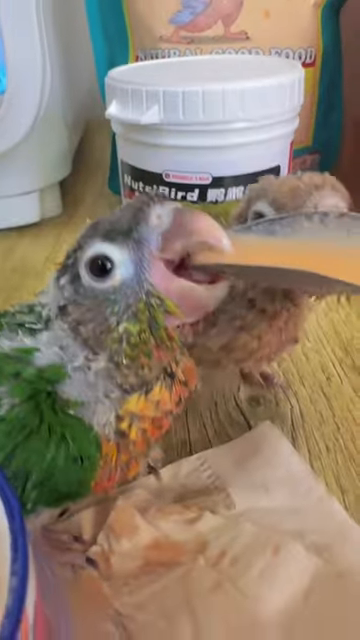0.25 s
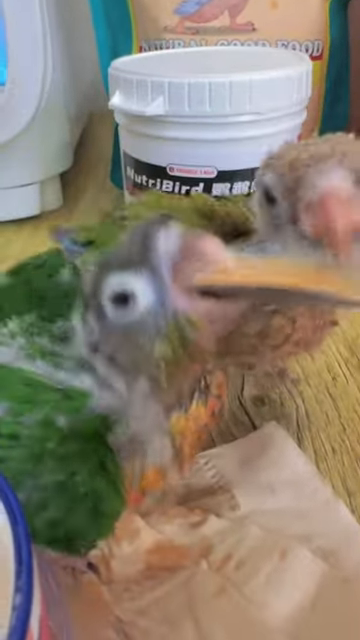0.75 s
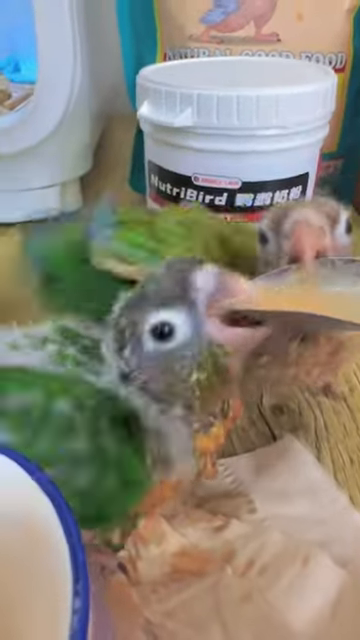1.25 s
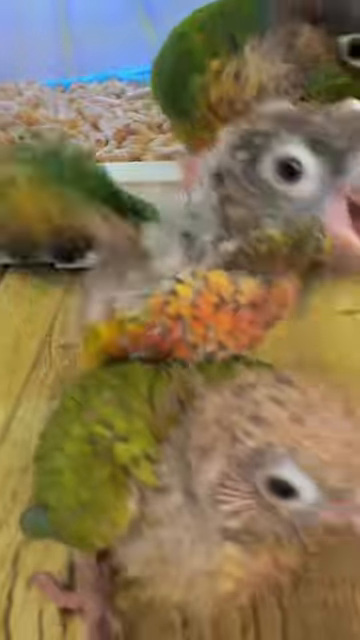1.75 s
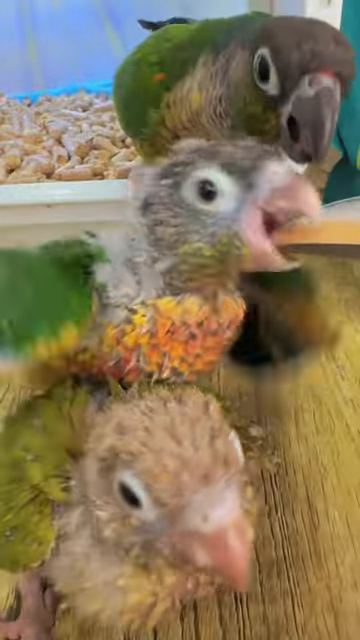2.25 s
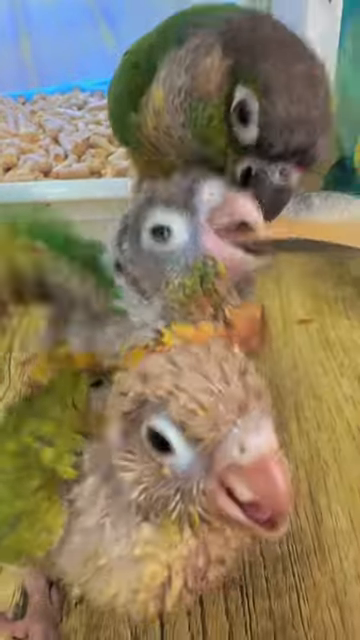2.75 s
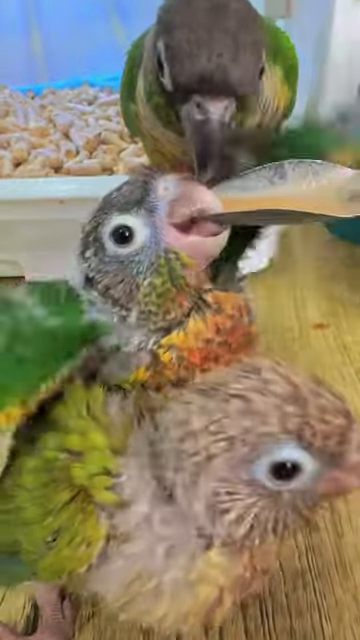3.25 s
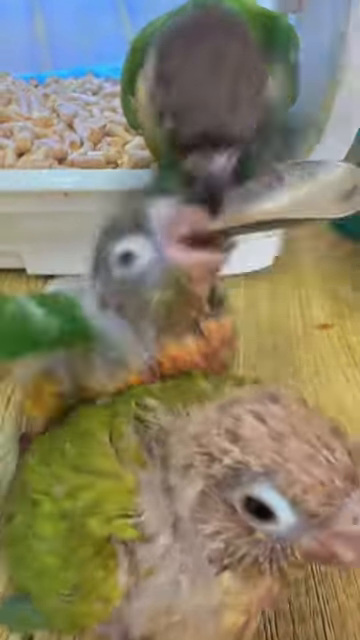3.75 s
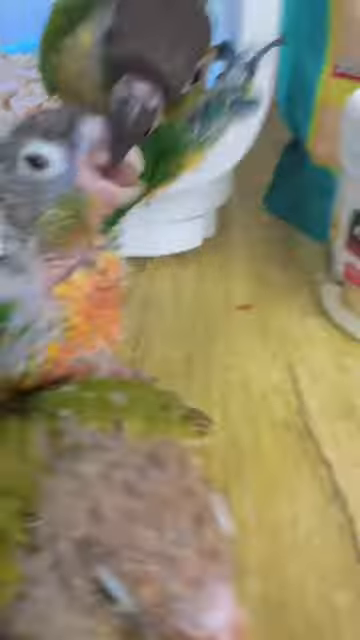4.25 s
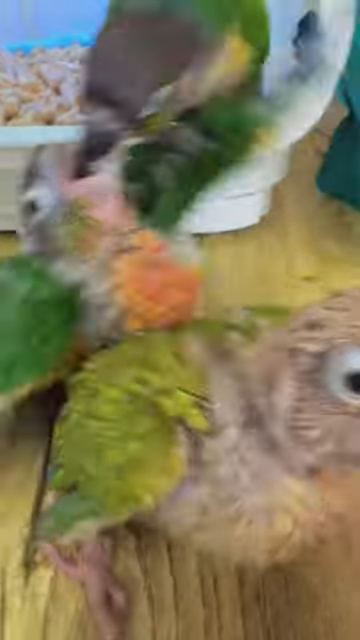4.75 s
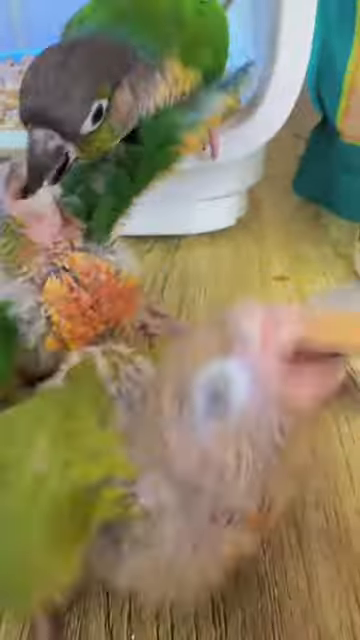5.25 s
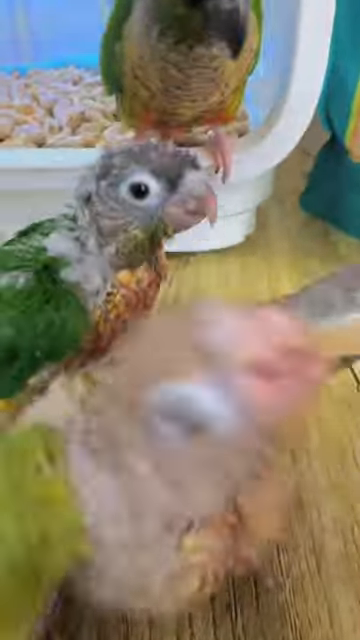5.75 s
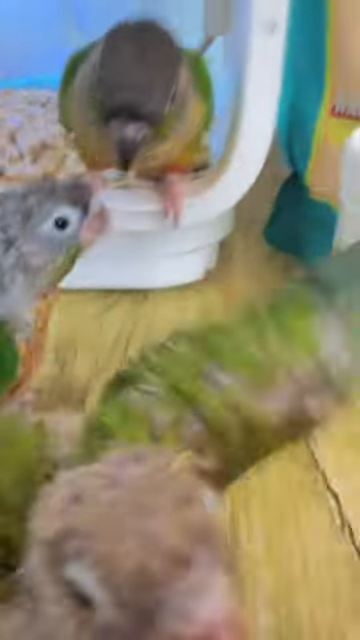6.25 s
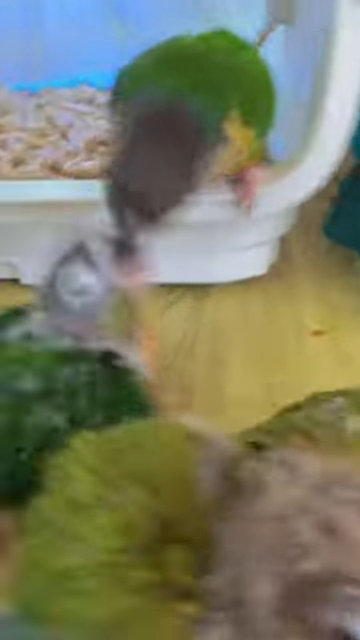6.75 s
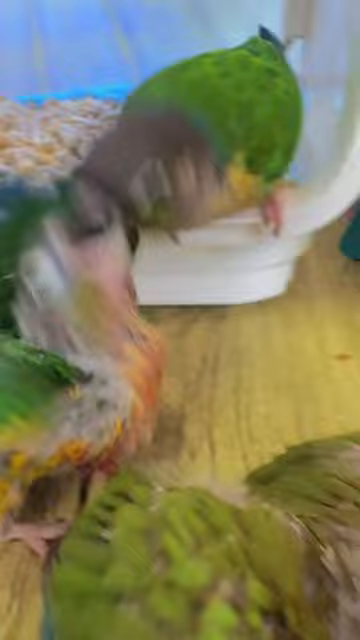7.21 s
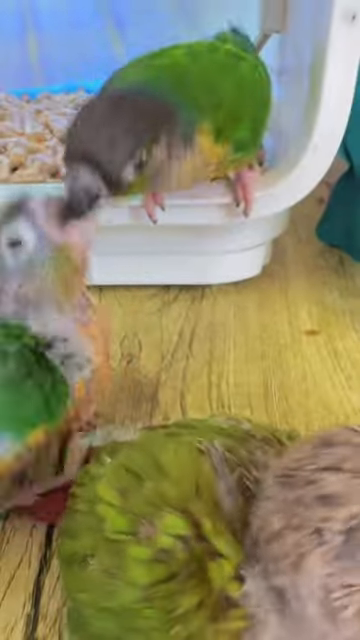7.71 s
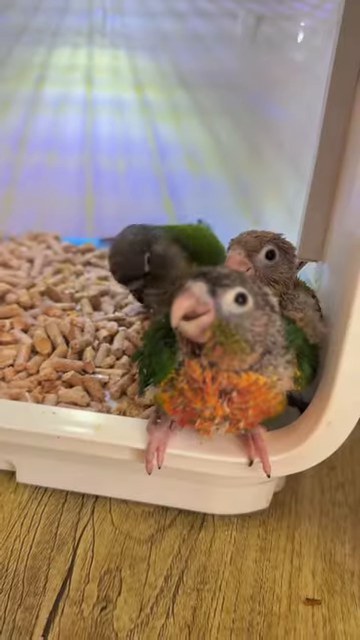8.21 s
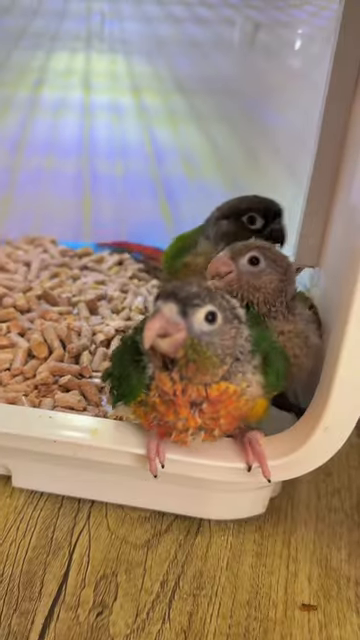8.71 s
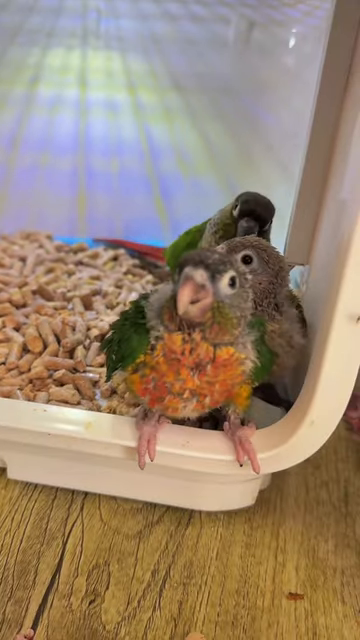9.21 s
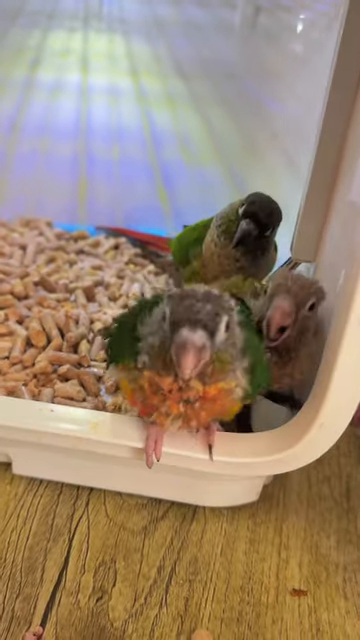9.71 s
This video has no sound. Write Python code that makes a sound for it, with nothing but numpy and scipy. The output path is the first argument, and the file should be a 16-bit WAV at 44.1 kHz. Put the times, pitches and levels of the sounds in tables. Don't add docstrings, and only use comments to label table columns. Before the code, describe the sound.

Close, shrill begging calls from parrot chicks, each about a twentieth of a second, some clear and arched, others fluttering and harsh. They start in spaced bursts, pause, then cluster around six seconds with small dry ticks. A soft wooden thump interrupts before eight seconds, then rapid squeaks and high yelps return. The indoor space adds a short, faint tail, with slight low rumble from movement.

```python
import sys
import numpy as np
from scipy import signal
from scipy.fft import rfft, irfft, next_fast_len
from scipy.io import wavfile
from scipy.ndimage import uniform_filter1d

SR = 44100
rng = np.random.default_rng(int(sys.argv[2]) if len(sys.argv) > 2 else 0)


def int16_out(signal):
    q = np.round(np.clip(np.atleast_2d(signal).T, -1, 1) * 32767)
    wavfile.write(sys.argv[1], SR, q.astype(np.int16))


def nominal_scale(level):
    x = np.asarray(level, float) / 20
    return 10 ** x


N = 439677

# (time [s], level [dB])
RUMBLE = [(0, -71.5), (1.5, -68.5), (2.1, -67), (2.5, -75), (3.3, -73), (3.8, -58), (4.15, -59.5),
          (4.35, -78), (5.4, -73.5), (5.999, -62.5), (7.1, -67), (7.4, -52), (8.1, -61), (8.45, -55),
          (8.8, -60), (9.97, -62.5)]
# (frequency [Hz], density [dB per Hz])
RUMBLE_COLOUR = [(25, -17), (60, 0), (130, -9), (320, -15.5), (900, -30), (3000, -45)]
# (time [s], peak [dB], ring [Hz])
TICKS = [(0.2255, -45.5, 1030), (2.0396, -58, 1585), (5.4881, -49, 5620), (5.6042, -48.5, 5730),
         (5.6498, -49, 6010), (5.7041, -44, 5840), (6.0566, -39, 7800), (6.2026, -27.5, 8240),
         (6.274, -46.5, 6900), (6.3792, -47.5, 1174), (6.434, -31.5, 7350), (7.5803, -20.5, 1189),
         (7.7089, -39, 1200), (8.248, -44.5, 7730), (8.2946, -49.5, 974), (8.4038, -43, 6860),
         (8.67, -27, 3490), (9.1655, -51, 1038)]
# (frequency
# [Hz], gain [dB])
CALL_COLOUR = [(300, -57.5), (700, -27.5), (1300, -25.5), (2500, -14), (4500, -4), (6000, -0.5), (8200, -6.5),
               (10300, -25), (11200, -42), (13500, -38), (15700, -22.5), (16400, -46)]
# (time [s], peak [dB])
KNOCKS = [(0.293, -41), (0.374, -54), (0.65, -56), (3.635, -52), (3.67, -50), (3.865, -50), (4.04, -50),
          (7.14, -52), (1.691, -37.5), (1.75, -45), (1.822, -52), (2.184, -50.5), (7.518, -40.5),
          (7.57, -37.5), (7.781, -22.5)]
# (frequency [Hz], level [dB], t60 [s])
BOARDS = [(119, -7, .17), (179, -1.5, .15), (338, 0.5, 0.11), (794, -14, 0.05)]
# (start [s], length [s], level [dB], first pitch [Hz], last pitch [Hz])
PEEPS = [(0.696, 0.11, -44.5, 992, 1600), (5.504, 0.074, -60.5, 1550, 1400),
         (6.039, 0.053, -59, 1450, 1400), (6.192, 0.028, -37, 1393, 1380), (6.373, 0.083, -56, 1193, 1330),
         (8.048, 0.069, -63.5, 1300, 1300)]

# (loudest moment [s], swell [s], fade [s], peak [dB], top pitch [Hz])
SQUEAKS = [(.536, 0.03, 0.041, -8.5, 1120), (1.246, 0.031, 0.04, -7, 1216),
           (3.424, 0.028, .026, -13.5, 1248), (6.621, .027, .031, -13.5, 1211),
           (9.696, .02, .036, -10, 1364)]
# (loudest moment [s], swell [s], fade [s], peak [dB], top pitch [Hz])
NOTES = [(.803, .03, .042, -10, 1150), (8.593, .023, .018, -11.5, 1366), (1.786, .029, .023, -11, 1295),
         (2.682, .03, .018, -15, 1303), (8.842, .018, .026, -11, 1355)]
# (loudest moment [s], swell [s], fade [s], peak [dB], top pitch [Hz])
PIPES = [(2.78, .015, .037, -15, 1254), (3.803, 0.026, .03, -10, 1303), (4.632, 0.029, 0.032, -15.5, 1227),
         (5.088, .032, 0.039, -13, 1236), (6.007, .016, .024, -9, 1190), (6.515, 0.025, .033, -9.5, 1257),
         (7.052, .029, .041, -12, 1241), (7.466, 0.031, 0.017, -14, 1215), (8.488, .022, .036, -11.5, 1385),
         (9.59, .033, .029, -12, 1370)]
# (loudest moment [s], swell [s], fade [s], peak [dB], top pitch [Hz])
DOUBLES = [(5.0, .024, 0.029, -13.5, 1394), (9.511, .013, .026, -11, 1467)]
# (loudest moment [s], swell [s], fade [s], peak [dB], top pitch [Hz])
CHIRPS = [(5.94, .018, .023, -19.5, 1150), (6.135, 0.014, .021, -17, 1200),
          (8.444, .015, 0.025, -13.5, 1200), (1.488, .018, .028, -21, 1000)]
# (loudest moment [s], swell [s], fade [s], peak [dB], top pitch [Hz])
RASPS = [(.295, .031, .041, -10.5, 1095), (.595, .022, 0.025, -16.5, 1240),
         (1.168, .028, .027, -14.5, 1250), (2.187, .013, .034, -12, 1324), (2.59, .021, .036, -11, 1369),
         (2.715, .015, .02, -19, 1325), (4.231, .014, .023, -14.5, 1246), (4.676, .022, 0.027, -19.5, 1178),
         (5.378, .022, .026, -20, 1178), (6.567, .019, .014, -19.5, 1393), (7.342, .016, .03, -20.5, 1250),
         (8.548, .015, .024, -17, 1130), (1.694, .015, .028, -13.5, 1380), (7.762, .025, .022, -17, 1290)]
# (loudest moment [s], swell [s], fade [s], peak [dB], top pitch [Hz])
SHRIEKS = [(3.94, .017, 0.024, -16.5, 1367), (4.535, .015, 0.023, -15, 1129),
           (6.835, 0.019, .025, -14.5, 1485)]
# (loudest moment [s], swell [s], fade [s], peak [dB], top pitch [Hz])
WHISTLES = [(8.717, .019, 0.031, -14, 2110), (8.795, .023, .03, -10, 2110)]
# (loudest moment [s], swell [s], fade [s], peak [dB], top pitch [Hz])
CROAKS = [(3.278, .029, .016, -21.5, 1550), (3.702, 0.013, 0.022, -19.5, 1080),
          (4.163, .033, 0.008, -25.5, 1299), (6.481, .01, 0.012, -16.5, 1079)]
# (half-pitch lines [dB], odd harmonics [dB], treble [dB], low harmonics [dB])
KINDS = [(SQUEAKS, (.21, .35, .65, .25, .27, .1, 2.3), (-24, -3, -3.5, -10)),
         (NOTES, (.2, .55, .6, .25, .05, .2, 3.6), (-24, -1.5, 1.5, -9.5)),
         (PIPES, (.3, .35, .6, .27, .24, .08, 2.7), (-17, -9, 1.5, -9)),
         (DOUBLES, (.28, .4, .45, .2, .05, .15, 3.3), (-3.5, -4, 1, -9)),
         (CHIRPS, (.34, .1, .55, .36, .15, .45, 2.1), (-25, -6, -5, -5)),
         (RASPS, (.58, .05, 0.48, .3, .17, .05, 2.8), (-24, -3.5, -6, -13)),
         (SHRIEKS, (.56, .1, .3, .27, .2, .05, 2.4), (-18.5, 6, -5, -16)),
         (WHISTLES, (.26, .4, .5, .2, .33, -.15, 2.9), (-22, -19, -16, -3)),
         (CROAKS, (.44, .03, .4, .38, .22, -.05, 1.9), (-28, -4, -5, -1.5))]

START_DB, END_DB = -39.5, -23.5
SWELL_BEND, FADE_BEND, RAGGED_BEND = 3.3, 2.6, 1.8
STRAIN_PER_DB = -0.0036
PEEP_RAGGED, PATCHY_DB = 0.72, 4.0
ROOM_T60_S, ROOM_DB, NEAR_WALL_DB = 0.22, -25, -13


def at_hz(points, hz):
    table_hz, table_db = np.array(points)[:, 0], np.array(points)[:, 1]
    return np.interp(np.log(hz + 1), np.log(table_hz), table_db)


def wobble(hz, size):
    x = signal.sosfilt(signal.butter(2, hz, fs=SR, output="sos"), rng.standard_normal(size))
    return x / x.std()


def ring(clicks, hz, t60_s):
    radius = nominal_scale(-60 / (t60_s * SR))
    angle = 2 * np.pi * hz / SR
    return signal.lfilter([0, np.sin(angle)], [1, -2 * radius * np.cos(angle), radius * radius], clicks + 1e-18)


def rumble():
    size = next_fast_len(N)
    shape = nominal_scale(at_hz(RUMBLE_COLOUR, np.fft.rfftfreq(size, 1 / SR)))
    mid, side = irfft(rfft(rng.standard_normal((2, size))) * shape, size)[:, :N]
    side = signal.lfilter([1, -1], [1, -0.96], side)
    time_s, level_db = np.transpose(RUMBLE)
    lumpy_db = np.interp(np.arange(N) / SR, time_s, level_db) + 3.5 * wobble(10, N)
    gain = nominal_scale(lumpy_db) / mid.std()
    return gain * (nominal_scale([[0.4], [-0.4]]) * mid + 0.25 * side * [[1], [-1]])


def ticks():
    out, t = np.zeros(N), np.arange(1500) / SR
    for time_s, peak_db, hz in TICKS:
        scratch = rng.standard_normal(len(t)) * np.exp(-t / 0.0023)
        scratch = signal.sosfilt(signal.butter(2, 0.4 * hz, "high", fs=SR, output="sos"), scratch)
        coloured = ring(scratch, hz, 3.0 / hz)
        start = round(time_s * SR)
        out[start:start + len(t)] += nominal_scale(peak_db) * (0.15 * scratch + coloured / np.abs(coloured).max())
    return out


def arch(call, manner):
    top_s, swell_s, fade_s, peak_db, top_hz = call
    ragged, fray_start, fray_end, short_start, short_end, crest, flatness = manner
    u = np.linspace(-1, 1, 15)
    early, off_peak = u < 0, np.abs(u)
    time_s = top_s + u * np.where(early, swell_s, fade_s)
    level_db = peak_db + np.where(early, START_DB * off_peak ** SWELL_BEND, END_DB * off_peak ** FADE_BEND)
    rising = u < crest
    sag = np.abs(u - crest) / np.where(rising, 1 + crest, 1 - crest)
    pitch_hz = top_hz * (1 - np.where(rising, short_start, short_end) * sag ** flatness)
    fray = ragged + np.where(early, fray_start, fray_end) * off_peak ** RAGGED_BEND
    fray = fray - STRAIN_PER_DB * (peak_db + 12.5)
    return np.transpose([time_s, level_db, pitch_hz, fray])


def squawk(rows, half_db, odd_db, treble_db, low_db, jitter, shimmer):
    time_s, level_db, pitch_hz, ragged = np.transpose(rows)
    t = np.arange(round(time_s[0] * SR), round((time_s[-1] + 0.006) * SR)) / SR
    pitch_hz = uniform_filter1d(np.interp(t, time_s, pitch_hz), size=200)
    ragged = np.clip(np.interp(t, time_s, ragged), 0, 1)
    jitter_rad = 0.3 * ragged ** 1.6 * jitter[:len(t)]
    phase = np.pi * np.cumsum(pitch_hz) / SR + jitter_rad
    line = np.arange(1, 30)[:, None]
    hz = line * pitch_hz / 2

    tilt_db = np.interp(hz, [3015, 3830, 5570, 6600], [low_db + 10, 0, 0, treble_db])
    odd_harmonic_db = odd_db * np.where(line > 2, 1, 0.5)
    parity_db = np.where(line % 2 == 1, half_db, np.where(line % 4 == 2, odd_harmonic_db, 0))
    colour_db = at_hz(CALL_COLOUR, hz) + tilt_db + parity_db
    height = nominal_scale(colour_db + rng.normal(0, 3, line.shape)) * (hz < 16400)
    height *= nominal_scale(PATCHY_DB * (0.3 + ragged) * jitter[np.arange(len(t)) // 4 + 900 * line])
    height /= np.sqrt(np.sum(height ** 2, axis=0) / 2)
    swing = height * np.exp(1j * (line * phase + rng.uniform(0, 2 * np.pi, line.shape)))

    apart = nominal_scale(NEAR_WALL_DB) * (rng.normal(0, 0.86, line.shape) + 1j * rng.standard_normal(line.shape))
    tone = np.imag([np.sum(swing * (1 + apart), axis=0), np.sum(swing * (1 - apart), axis=0)])
    tone *= nominal_scale(9.5 * ragged * np.tanh(0.7 * shimmer[:len(t)]) - 1.7 * ragged - 1.3)
    fade = np.clip((t[-1] - t) / 0.006, 0, 1)
    return tone * fade * np.interp(t, time_s, nominal_scale(level_db / 2)) ** 2


def chicks():
    out, jitter, shimmer = np.zeros((2, N)), wobble(340, N + SR), wobble(970, N)
    calls = [(arch(call, manner), voice) for table, manner, voice in KINDS for call in table]
    for start_s, length_s, db, first_hz, last_hz in PEEPS:
        rows = [(start_s, db - 12.5, first_hz, PEEP_RAGGED),
                (start_s + length_s / 2, db, (first_hz + last_hz) / 2, PEEP_RAGGED),
                (start_s + length_s, db - 7.0, last_hz, PEEP_RAGGED)]
        calls.append((rows, (-20, -9.0, 0.55, -3.0)))
    for rows, voice in calls:
        i = round(rows[0][0] * SR)
        call = squawk(rows, *voice, jitter[i:], shimmer[i:])
        out[:, i:i + call.shape[1]] += call
    size = next_fast_len(N)
    hz = np.fft.rfftfreq(size, 1 / SR)
    shut_db = np.interp(hz, [320, 900, 10500, 11100, 13000, 14500], [-17, -0.5, -0.5, -25, -16, 3.5])
    return irfft(rfft(out, size) * nominal_scale(shut_db), size)[:, :N]


def knocks():
    out, t = np.zeros(N), np.arange(round(0.3 * SR)) / SR
    for time_s, peak_db in KNOCKS:
        push = rng.standard_normal(len(t)) * np.exp(-t / 0.014)
        body = sum(nominal_scale(level_db) * ring(push, hz, t60_s) for hz, level_db, t60_s in BOARDS)
        dull_noise = signal.lfilter([1], [1, -0.7], rng.standard_normal(len(t)))
        rustle = signal.sosfilt(signal.butter(1, [130, 520], "band", fs=SR, output="sos"), dull_noise)
        rustle = rustle * np.exp(-t / 0.05)
        blow = body / np.abs(body).max() + 0.61 * rustle / np.abs(rustle).max()
        start = round(time_s * SR)
        out[start:start + len(t)] += nominal_scale(peak_db) * blow
    return out


def room(x):
    t = np.arange(round(0.5 * SR)) / SR
    tail = rng.standard_normal((2, len(t))) * nominal_scale(-60 * t / ROOM_T60_S) * (1 - np.exp(-t / 0.018))
    tail = nominal_scale(ROOM_DB) * tail / np.linalg.norm(tail[0])
    return x + signal.fftconvolve(x, tail, axes=1)[:, :N]


def scene():
    boards = nominal_scale([[1.8], [-1.8]]) * knocks()
    return room(chicks() + ticks() + boards) + rumble()


def low_pass(x):
    return signal.sosfilt(signal.butter(12, 16970, fs=SR, output="sos"), x)


def record(dry):
    rounded = np.tanh(dry)
    mix = signal.sosfilt(signal.cheby2(10, 70, 16900, fs=SR, output="sos"), rounded)
    return low_pass(mix)


dry = scene()
out = record(dry)
int16_out(out)
```